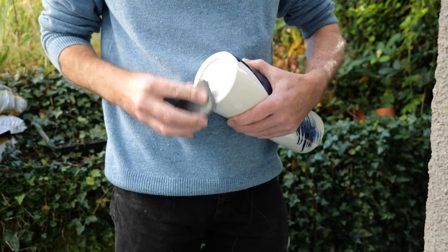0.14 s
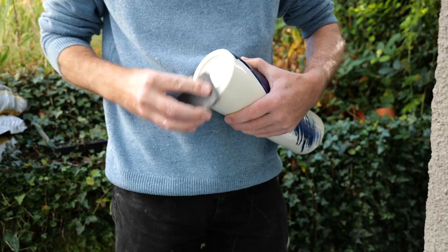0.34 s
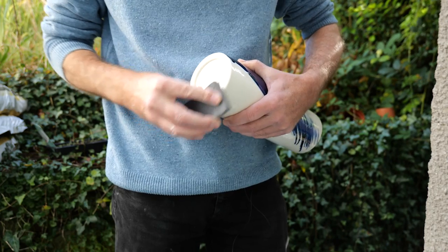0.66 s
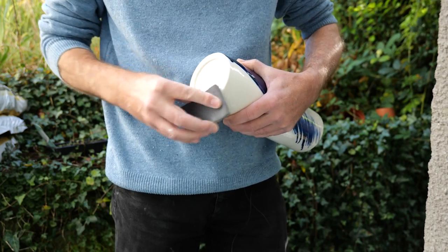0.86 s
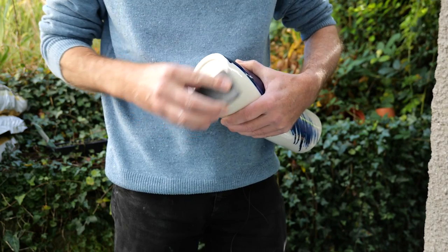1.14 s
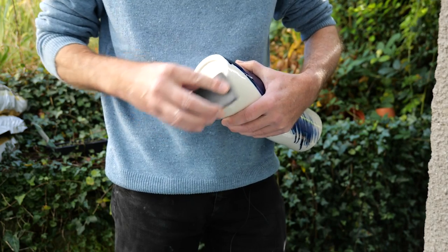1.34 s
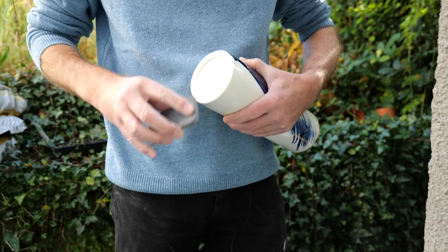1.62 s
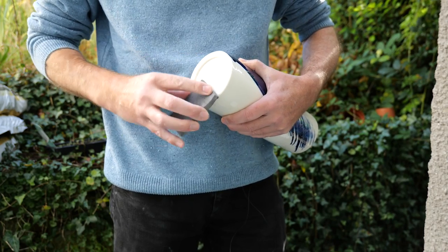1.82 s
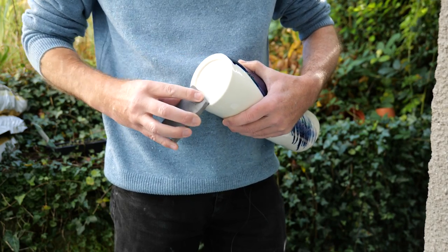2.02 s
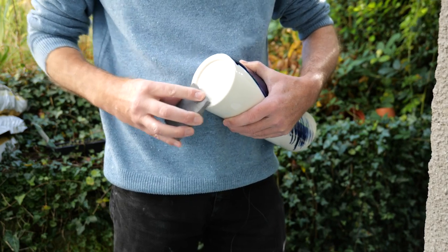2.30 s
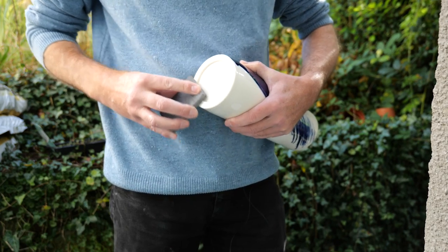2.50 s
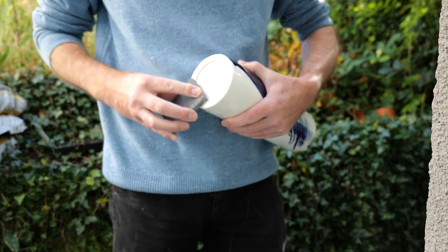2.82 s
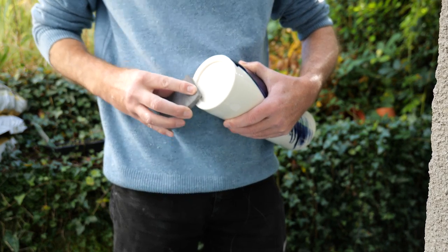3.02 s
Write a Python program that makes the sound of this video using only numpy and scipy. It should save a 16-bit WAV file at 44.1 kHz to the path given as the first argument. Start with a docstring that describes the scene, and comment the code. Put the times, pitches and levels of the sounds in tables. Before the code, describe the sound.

A sanding pad rasps rapidly back and forth on a ceramic vase, pausing briefly once.

```python
"""A sanding pad is rubbed to and fro on the unglazed foot of a ceramic vase, about nine strokes a second.
At first it lies flat on the base and sounds hollow: grit catching on the clay makes a rasp, which
brightens with hand speed and faintly rings the vase. The pad lifts off, leaving quiet air and a trace of
microphone hiss. It then lands with a tick and works the rim, louder and sharper."""
import sys
import numpy as np
from scipy import signal
from scipy.fft import rfft, irfft, next_fast_len
from scipy.io import wavfile
from scipy.ndimage import uniform_filter1d, map_coordinates

SR = 44100
rng = np.random.default_rng(int(sys.argv[2]) if len(sys.argv) > 2 else 0)


def generate_wav(sig):
    """Save sig (samples, or channels by samples) to the path in sys.argv[1] as 16-bit PCM at SR."""
    pcm = np.round(np.clip(np.atleast_2d(sig).T, -1, 1) * 32767).astype(np.int16)
    wavfile.write(sys.argv[1], SR, pcm)


N = 138915

# Strokes on the base and on the rim, with the relative levels of their parts:
# start_s, turn_speed_ratio, rasp_db, hiss_db, fizz_db, hollow_db, ring_db
BASE_STROKES = [(-.05, 0.1, -41, -42, -46.5, -43.5, -52), (.052, 0.42, -44, -39, -45.5, -41.5, -48),
                (.166, 0.26, -41.5, -42, -48.5, -42.5, -51), (.277, 0.25, -43.5, -40.5, -47, -43.5, -47.5),
                (.385, 0.42, -42.5, -45, -47.5, -43.5, -56), (.497, 0.37, -43, -42.5, -46, -41.5, -44.5),
                (.615, 0.62, -43, -44, -48, -48, -50), (.732, 0.26, -44, -40, -42.5, -39.5, -43.5),
                (.853, 0.65, -43, -45.5, -48, -50, -49), (.966, 0.3, -42.5, -40.5, -43, -40.5, -44.5),
                (1.085, 0.75, -45, -44, -48, -50.5, -50.5), (1.2, 0.9, -44, -40.5, -43, -47, -47.5),
                (1.311, 0.82, -41, -47.5, -46, -51, -55.5), (1.42, 0.23, -44, -42, -41.5, -46.5, -49),
                (1.538, 0.92, -43.5, -48, -48, -49.5, -52)]
RIM_STROKES = [(1.956, 0.2, -43.5, -41, -45, -45, -51), (2.102, 0.22, -43, -50, -46.5, -46.5, -63),
               (2.208, 0, -40, -37, -37, -42.5, -54), (2.336, 0, -36.5, -48, -46, -44.5, -50.5),
               (2.459, 0.33, -36.5, -34, -39, -42.5, -50.5), (2.583, 0.16, -36.5, -37, -41.5, -46, -54),
               (2.697, 0.6, -38.5, -33.5, -40, -42.5, -48), (2.823, 0.12, -37.5, -43, -50, -49, -63),
               (2.916, 0, -36, -34.5, -42.5, -45.5, -49), (3.04, 0.7, -39.5, -47, -51, -44.5, -62)]
# Spectra of the friction noise, the landing and the air: frequency_hz, relative_density_db
BASE_RASP = [(100, -15), (230, -7.5), (310, -9), (450, -3), (900, -6.5), (2400, -4), (3600, 0.5), (5100, 1),
             (6400, 3), (8500, -1), (10200, -5), (15500, -16)]
BASE_HISS = [(2000, -37), (5200, -11), (6100, 0.5), (6900, 1.5), (7900, -6.5), (9200, -14.5), (10200, -22),
             (15500, -19)]
BASE_FIZZ = [(4000, -27), (7500, -2), (8800, 5), (10100, 0.5), (11200, 0.5), (12000, -2.5), (13200, -1),
             (15500, -5.5)]
BASE_HOLLOW = [(200, -27.5), (450, -14), (780, -7), (1300, -1.5), (1800, -2.5), (2350, -2), (3000, -8),
               (4200, -17.5), (9000, -52)]
RIM_RASP = [(150, -22.5), (310, -23), (650, -17), (1600, -11), (2800, -9), (3400, 0), (4800, 0), (6000, 1),
            (8000, -6), (11000, -14.5), (15500, -21)]
RIM_HISS = [(1500, -43), (4200, -12), (5400, -3.5), (6200, 0.5), (7100, -1.5), (8200, -9.5), (9600, -16),
            (15500, -30)]
RIM_FIZZ = [(4000, -26), (7500, 4), (9300, 2.5), (10500, -3.5), (11200, -1.5), (11800, -14), (12700, -2.5),
            (15500, -8.5)]
RIM_HOLLOW = [(200, -19.5), (500, -13.5), (900, -8), (1400, -4), (1850, -2.5), (2650, 0), (4000, 1),
              (9000, -42)]
LANDING_SPECTRUM = [(150, -17), (450, -3), (1200, 3), (2300, -2), (4200, -6), (6000, -13), (15000, -21)]
AIR_SPECTRUM = [(20, -14), (35, -14), (54, 8), (78, 2), (100, -4.5), (200, -0.5), (320, -6), (460, 0),
                (1000, -2.5), (1800, -11), (3000, -20), (7000, -24), (15000, -38)]
# Modes of the vase: pitch_hz, bandwidth_hz, gain_db
VASE_MODES = [(782, 42, -12), (1477, 12, -23), (2180, 31, -19.5), (3380, 76, -11), (3727, 40, -21),
              (3882, 24, -3.5), (4400, 28, -4), (4650, 25, -14), (5100, 33, -13), (5500, 29, -14),
              (7870, 77, -21), (8550, 43, -10)]
# Side signal relative to centre: frequency_hz, gain_db
SIDE_SPECTRUM = [(100, -23), (500, -22), (1500, -28), (4500, -28), (8000, -25), (13000, -17.5)]

LIFT_S, LANDING_S, RIM_END_S = 1.6114, 1.9245, 3.16
PRESS_S, RELEASE_S = 0.028, 0.021
GRAINS_PER_S, GRAIN_SPREAD_DB = 3000, 3
HISS_EXPONENT, FIZZ_EXPONENT = 1.9, 1.8  # powers of hand speed


def rim_sanding():
    """Friction noise grows with sliding speed: on the narrow rim, hiss and fizz flare at mid-stroke."""
    speed, (rasp, hiss, fizz, hollow, ring) = hand(RIM_STROKES, RIM_END_S, skew=0.99)
    since_start_s = np.arange(N) / SR - RIM_STROKES[0][0]
    press = np.clip(since_start_s / PRESS_S, 0, 1) ** 0.5
    sound = (rasp * speed ** 0.41 * grit(RIM_RASP, coarse_db=-2, patchy_db=3.5)
             + hiss * speed ** HISS_EXPONENT * grit(RIM_HISS, coarse_db=-9, patchy_db=2)
             + fizz * speed ** FIZZ_EXPONENT * grit(RIM_FIZZ, coarse_db=-1, patchy_db=4)
             + hollow * speed ** 0.3 * grit(RIM_HOLLOW, coarse_db=-3.5, patchy_db=3.5)
             + ring * speed ** 0.34 * resonance(pitch_hz=2220, width_hz=400)  # foot under the pad
             + amp(-63) * resonance(pitch_hz=430, width_hz=183))  # body of the vase
    return press * sound * flicker(depth_db=1.03)


def base_sanding():
    """Sliding friction under the whole pad: the hiss swells first, then the hollow tone, then the ring."""
    speed, (rasp, hiss, fizz, _, _) = hand(BASE_STROKES, LIFT_S, skew=0.78)
    hollow_speed, (*_, hollow, _) = hand(BASE_STROKES, LIFT_S, skew=0.97, lag_s=0.016)
    ring_speed, (*_, ring) = hand(BASE_STROKES, LIFT_S, skew=1.3, lag_s=0.036)
    sound = (rasp * speed ** 0.21 * grit(BASE_RASP, coarse_db=-5, patchy_db=3)
             + hiss * speed ** HISS_EXPONENT * grit(BASE_HISS, coarse_db=-10, patchy_db=4.5)
             + fizz * speed ** FIZZ_EXPONENT * grit(BASE_FIZZ, coarse_db=-2, patchy_db=3.5)
             + hollow * hollow_speed ** 1.02 * glide(grit(BASE_HOLLOW, coarse_db=-4.5, patchy_db=2.7))
             + ring * ring_speed ** 0.84 * resonance(pitch_hz=2460, width_hz=780))  # cavity of the vase
    return sound * flicker(depth_db=0.74)


def hand(strokes, end_s, skew, lag_s=0):
    """Reciprocating motion: speed traces one arch a stroke. Returns it with the gains of the parts."""
    t = np.arange(N) / SR
    start_s, turn_speed, *levels_db = np.transpose(strokes)
    position = stroke_position(t - lag_s, strokes, end_s)
    turn_speed = np.interp(t - lag_s, start_s, turn_speed)
    arch = np.sin(np.pi * (position % 1) ** skew)
    speed = np.hypot(turn_speed, np.sqrt(1 - turn_speed ** 2) * arch)
    row = np.minimum(position.astype(int), len(strokes) - 1)
    contact = (t > start_s[0]) * np.clip((end_s - t) / RELEASE_S, 0, 1)
    return speed, [contact * amp(uniform_filter1d(db[row], size=900)) for db in levels_db]


def stroke_position(t, strokes, end_s):
    """The phase of the motion advances by one with each stroke."""
    turns_s = [stroke[0] for stroke in strokes] + [end_s]
    return np.interp(t, turns_s, np.arange(len(turns_s)))


def grit(spectrum, coarse_db, patchy_db):
    """Abrasion: fine scratches and coarse grains snapping free; the colour shifts as the contact moves."""
    snaps = (rng.random(N) < GRAINS_PER_S / SR) * np.sign(rng.standard_normal(N))
    grains = snaps * amp(GRAIN_SPREAD_DB * rng.standard_normal(N))
    spectrogram = signal.stft(rng.standard_normal(N), nperseg=1024)[2]
    patches = rng.standard_normal(spectrogram.shape)
    for axis in (0, 1):  # smooth over frequency, then time
        patches = uniform_filter1d(patches, size=5, axis=axis)
    scratches = signal.istft(spectrogram * amp(patchy_db * unit(patches)), nperseg=1024)[1][:N]
    return coloured(unit(scratches) + amp(coarse_db) * unit(grains), spectrum)


def glide(x, octaves=0.55):
    """Frequency scaling: the hollow tone climbs each time the pad crosses the base."""
    phase = stroke_position(np.arange(N) / SR, BASE_STROKES, LIFT_S) % 1
    pitch_ratio = 2 ** (octaves * (phase - 0.5))
    return unit(map_coordinates(x, [np.cumsum(pitch_ratio)], mode='mirror'))


def flicker(depth_db, rate_hz=110):
    """Random amplitude modulation: a gain that wavers smoothly."""
    knots = rng.standard_normal(int(N * rate_hz / SR) + 4)
    return amp(depth_db * map_coordinates(knots, [np.arange(N) * rate_hz / SR]))


def resonance(pitch_hz, width_hz):
    """Resonance confines friction noise to one band."""
    return unit(filtered(rng.standard_normal(N), lambda hz: mode(hz, pitch_hz, width_hz) ** 2))


def vase(x):
    """Modal superposition: the hand-damped ceramic adds narrow resonances to whatever rubs it."""
    return filtered(x, lambda hz: 1 + sum(amp(db) * mode(hz, pitch_hz, width_hz)
                                          for pitch_hz, width_hz, db in VASE_MODES))


def mode(hz, pitch_hz, width_hz):
    """A damped oscillator responds most at its natural frequency."""
    damping = 1j * hz * width_hz
    return damping / (pitch_hz ** 2 - hz ** 2 + damping)


def landing():
    """Impact transient: the pad meets the rim with a soft tick and scuffs faintly as it settles."""
    t = np.arange(N) / SR - LANDING_S
    tick = amp(-44.5) * decay(t, t60_s=0.013)
    scuff = amp(-54) * decay(t, t60_s=0.28)
    return (tick + scuff) * coloured(rng.standard_normal(N), LANDING_SPECTRUM)


def reverberation(x):
    """Diffuse reflections from the surroundings add a weak, short tail."""
    t = np.arange(SR // 2) / SR
    tail = rng.standard_normal(len(t)) * decay(t, t60_s=0.55)
    return amp(-13.5) * signal.fftconvolve(x, tail / np.linalg.norm(tail))[:N]


def with_side(x, delay_s):
    """Side signal: a weak delayed copy is added left and subtracted right; the sound stays nearly mono."""
    side = filtered(x, lambda hz: spectral_gain(SIDE_SPECTRUM, hz) * np.exp(-2j * np.pi * hz * delay_s))
    return np.array([x + side, x - side])


def air():
    """Ambient noise: steady, quiet and strongest in the bass."""
    return amp(-62) * coloured(rng.standard_normal(N), AIR_SPECTRUM)


def amp(db):
    """Amplitude ratio of a level in decibels."""
    return 10 ** (np.asarray(db) / 20)


def unit(x):
    """Normalisation to rms 1."""
    return x / np.sqrt(np.mean(x ** 2) + 1e-20)


def decay(t, t60_s):
    """Exponential decay from t = 0, silent before."""
    return (t >= 0) * np.exp(-np.log(1000) * np.abs(t) / t60_s)


def spectral_gain(spectrum, hz):
    """Gain from levels interpolated on a logarithmic frequency axis."""
    frequency_hz, level_db = np.transpose(spectrum)
    return amp(np.interp(np.log(hz + 1), np.log(frequency_hz + 1), level_db))


def filtered(x, response):
    """Linear filtering multiplies the spectrum by a frequency response."""
    size = next_fast_len(N + SR // 2)
    return irfft(rfft(x, size) * response(np.fft.rfftfreq(size, 1 / SR)), size)[..., :N]


def coloured(x, spectrum):
    """Spectral shaping, at rms 1."""
    return unit(filtered(x, lambda hz: spectral_gain(spectrum, hz)))


def scene():
    """Superposition: close sanding and its reverberation over quiet air and microphone hiss."""
    sanding = amp(-2) * vase(base_sanding() + landing() + rim_sanding())
    stereo = with_side(sanding + reverberation(sanding) + air(), delay_s=0.007)
    microphone_hiss = amp(-73) * rng.standard_normal((2, N))
    return stereo + microphone_hiss


def record(dry):
    """Band limiting: an ideal low-pass filter removes the highest treble."""
    return filtered(dry, lambda hz: hz < 15700)


dry = scene()
out = record(dry)
generate_wav(out)
```